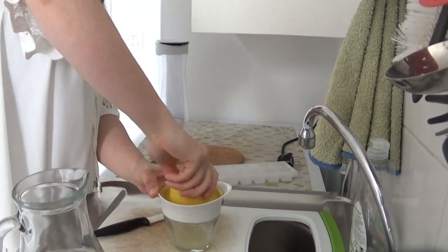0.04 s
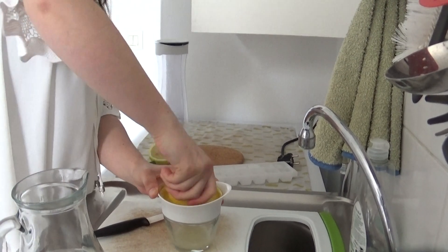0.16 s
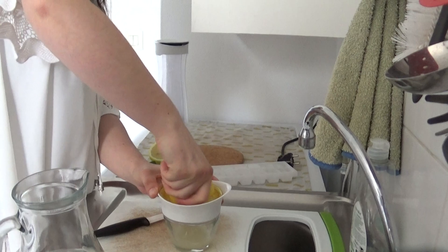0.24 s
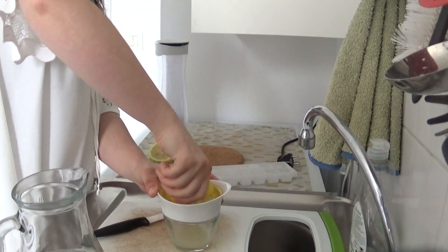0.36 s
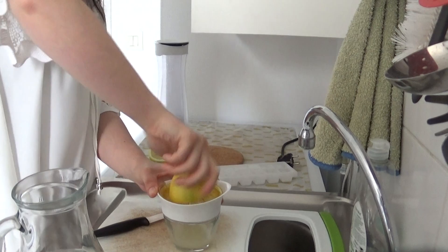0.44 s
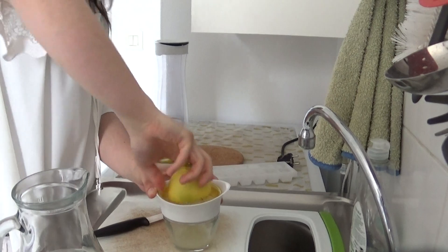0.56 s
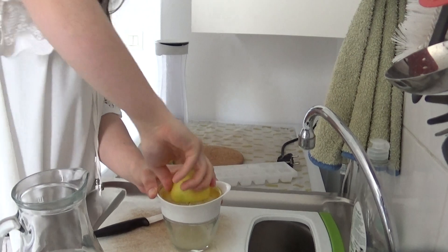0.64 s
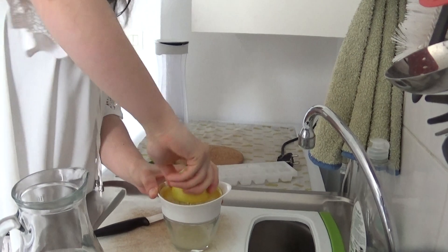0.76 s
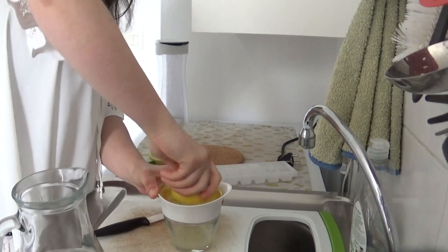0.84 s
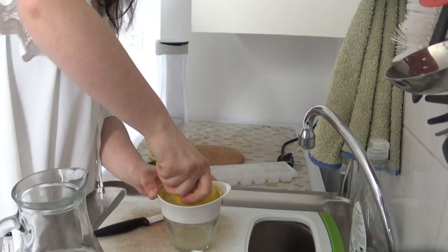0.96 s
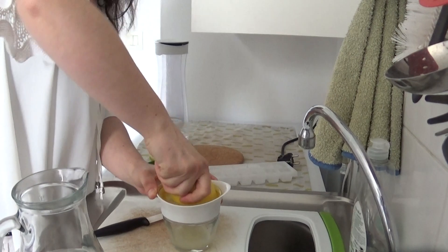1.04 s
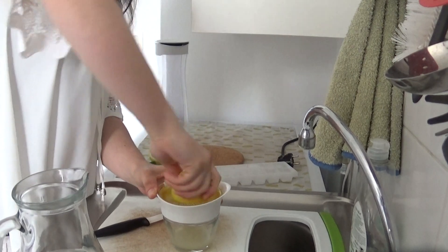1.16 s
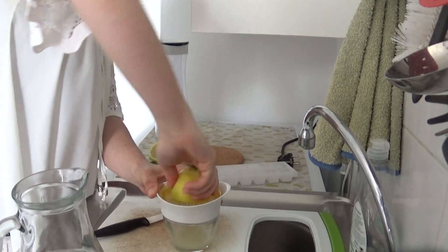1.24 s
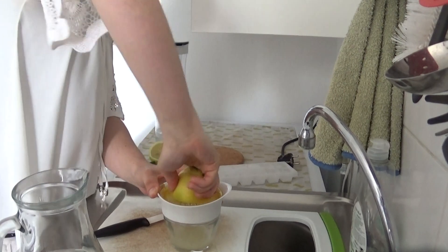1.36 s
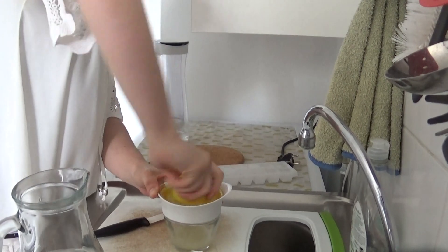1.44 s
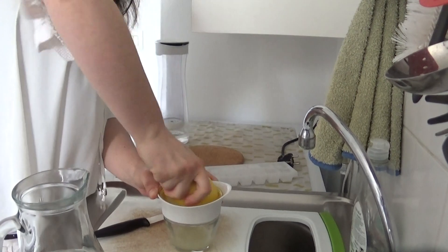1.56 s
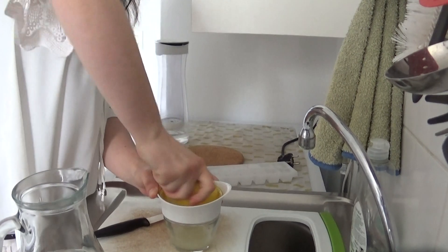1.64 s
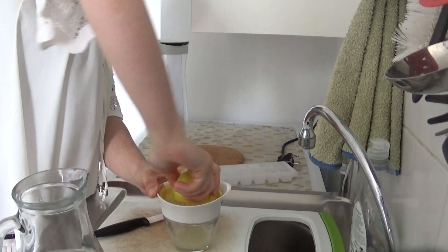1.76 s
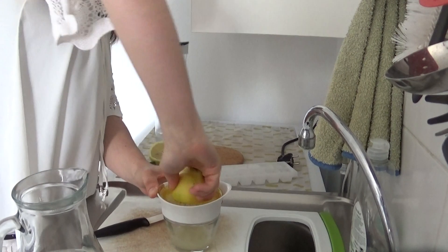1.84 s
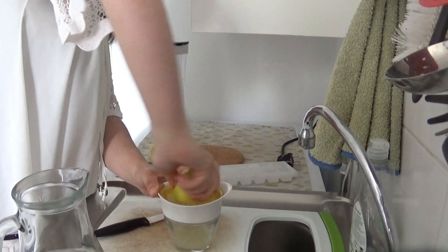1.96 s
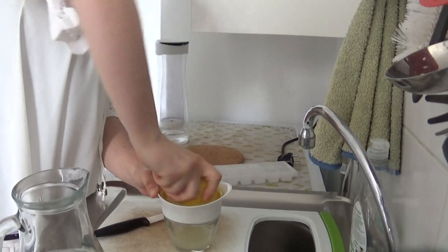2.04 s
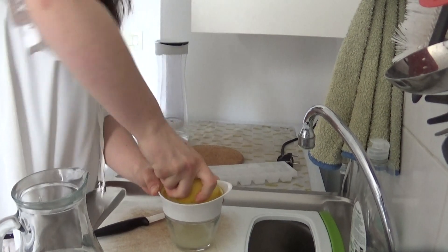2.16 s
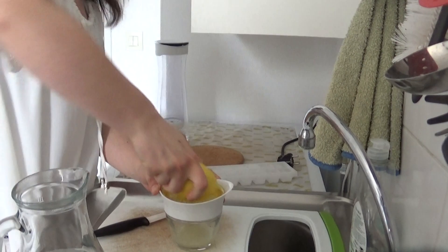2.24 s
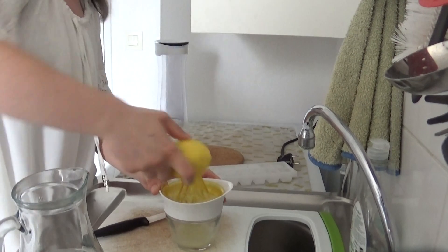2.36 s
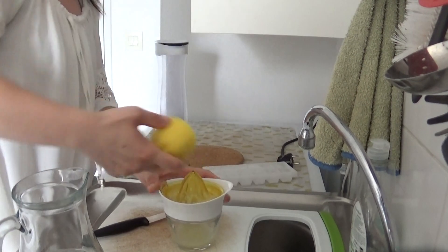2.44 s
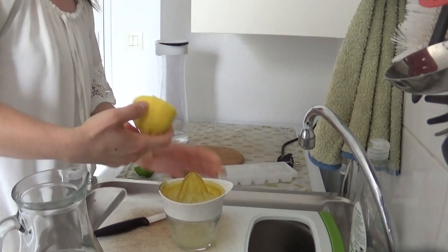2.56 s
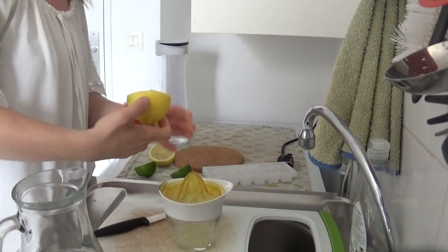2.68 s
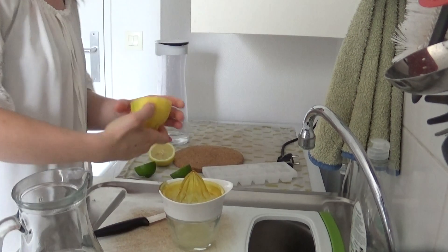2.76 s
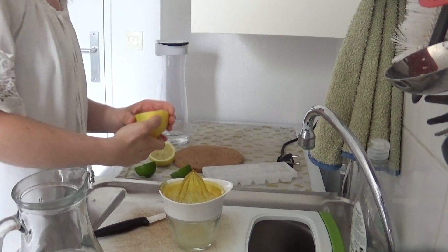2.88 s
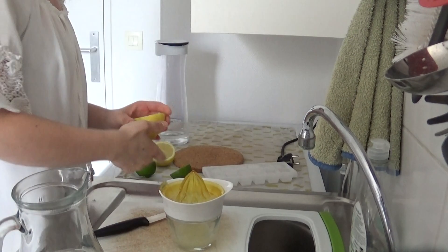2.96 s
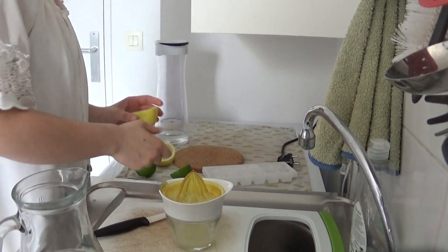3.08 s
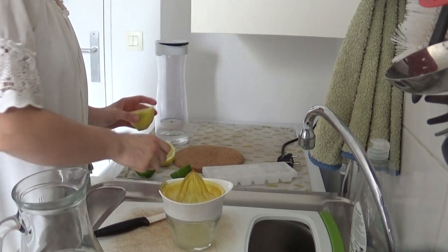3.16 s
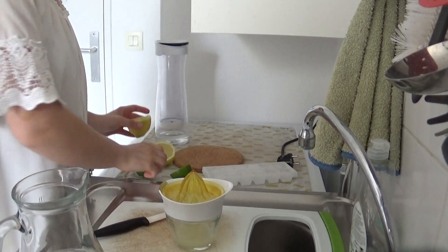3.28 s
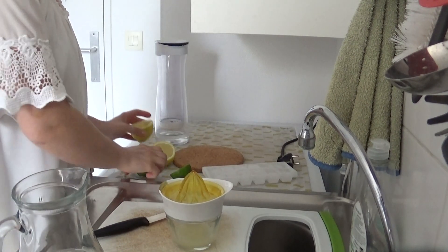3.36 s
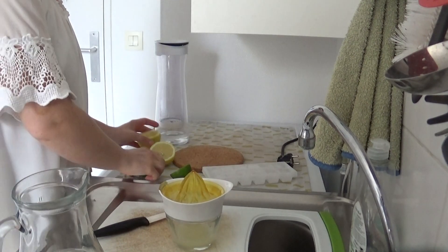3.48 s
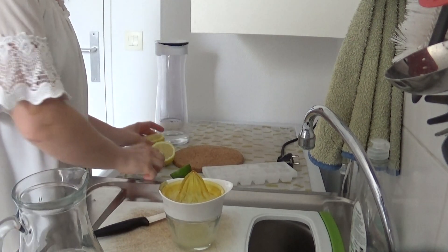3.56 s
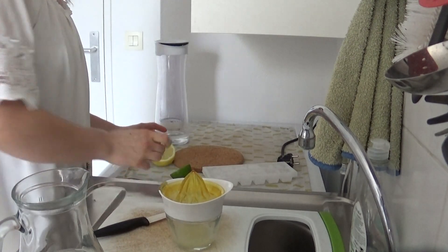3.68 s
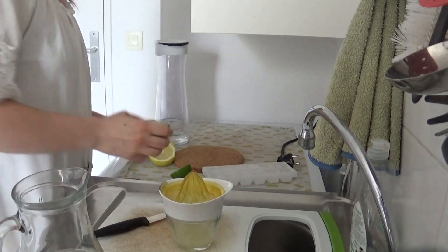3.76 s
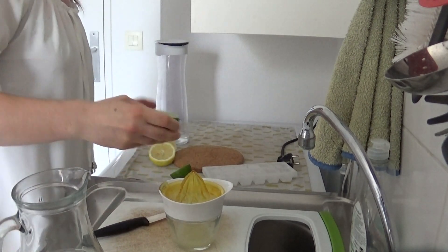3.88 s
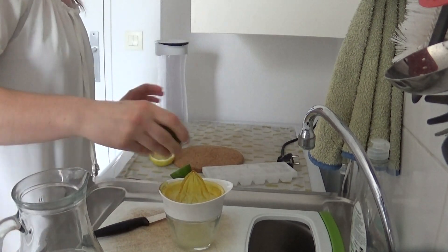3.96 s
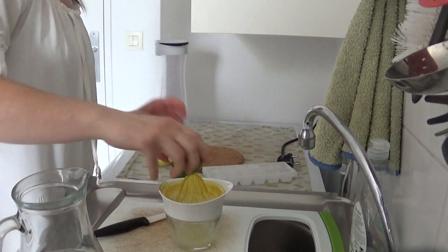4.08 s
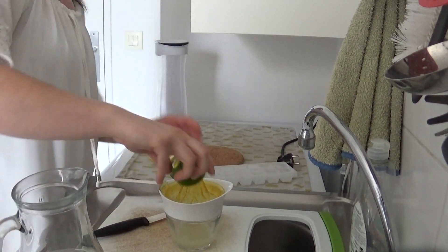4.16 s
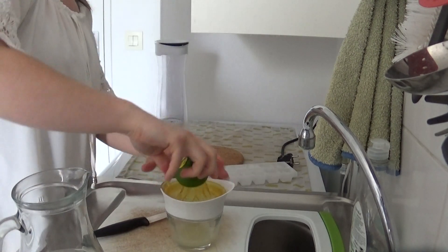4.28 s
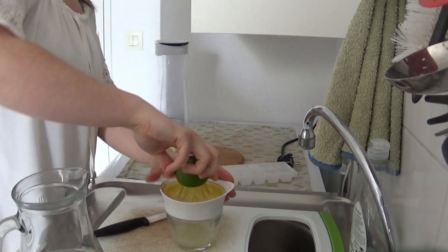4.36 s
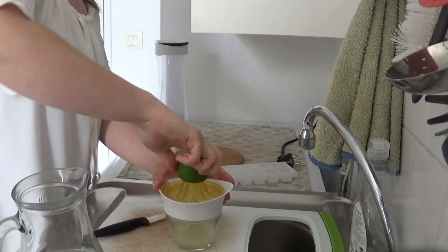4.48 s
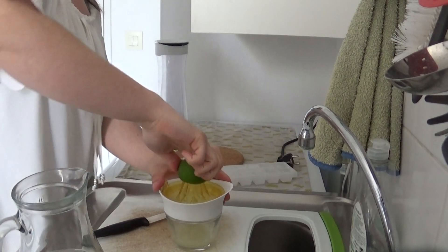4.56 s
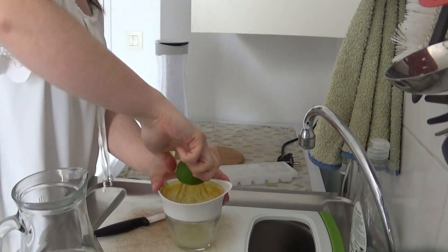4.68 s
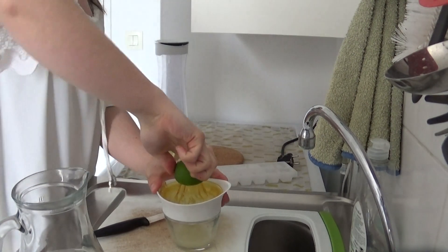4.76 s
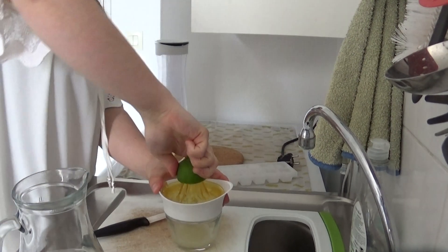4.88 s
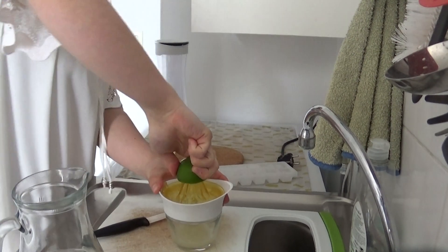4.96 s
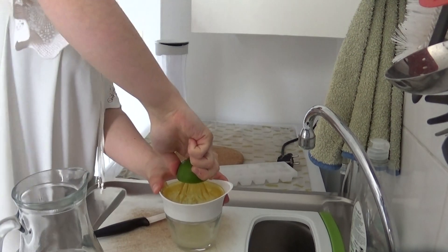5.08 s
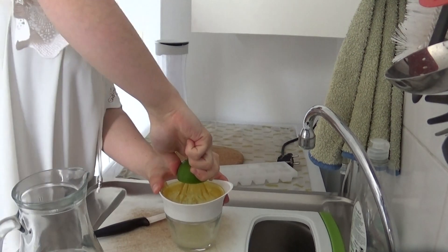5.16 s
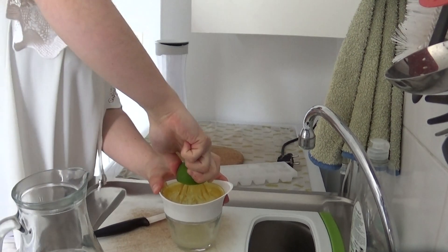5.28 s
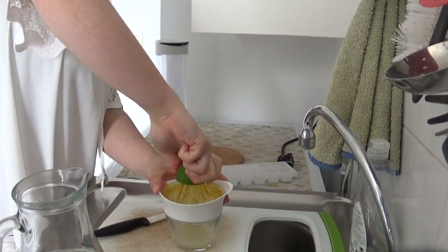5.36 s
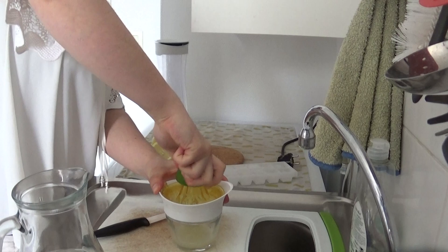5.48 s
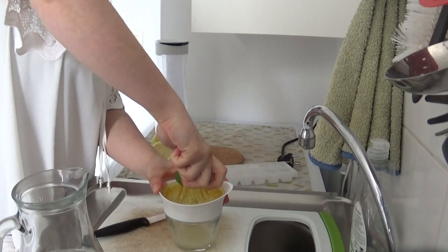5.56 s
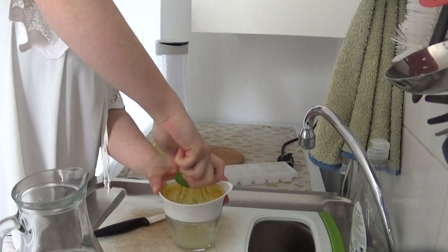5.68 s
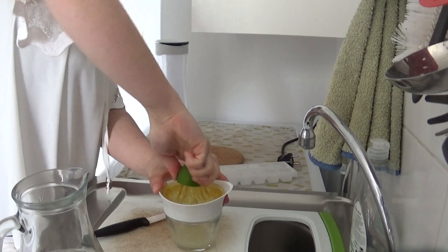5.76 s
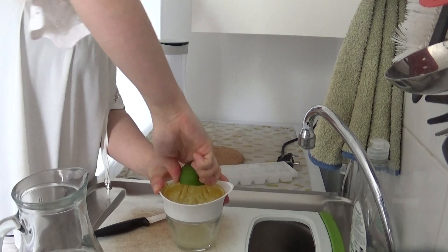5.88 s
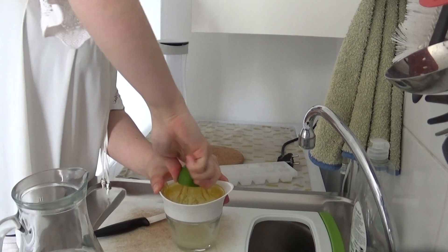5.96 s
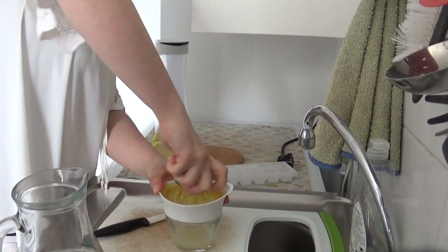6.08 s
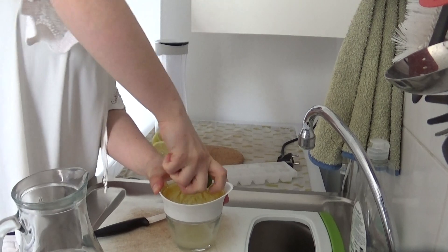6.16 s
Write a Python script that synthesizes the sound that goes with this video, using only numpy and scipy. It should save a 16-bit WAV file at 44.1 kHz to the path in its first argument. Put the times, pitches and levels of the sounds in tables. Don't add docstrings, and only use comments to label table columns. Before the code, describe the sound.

Juicy squishes, pops and rind smacks in a small kitchen, a dull put-down thud, a near-quiet pause, then faint plastic ticking and squeaky rubbing.

```python
import sys
import numpy as np
from scipy import signal
from scipy.fft import rfft, irfft
from scipy.io import wavfile
from scipy.ndimage import uniform_filter1d

SR = 44100
rng = np.random.default_rng(int(sys.argv[2]) if len(sys.argv) > 2 else 0)


def ratio(d):
    e = np.asarray(d, float) / 20
    return 10 ** e


def output_pcm(signal):
    pcm = np.clip(np.atleast_2d(signal).T, -1, 1) * 32767
    wavfile.write(sys.argv[1], SR, np.round(pcm).astype(np.int16))


N = 274302
HARD_FROM_S = 4.7


def evened(x):
    return x / np.sqrt(np.mean(x ** 2) + 1e-20)


def steady(x, over_s):
    return x / np.sqrt(uniform_filter1d(x ** 2, int(over_s * SR)) + 1e-9)


def read(points, hz):
    f, value = np.transpose(points)
    return np.interp(np.log(hz + 1), np.log(f + 1), value)


def over_time(points):
    return np.interp(np.arange(N) / SR, *np.transpose(points))


def colour(x, points):
    gain = ratio(read(points, np.fft.rfftfreq(len(x), 1 / SR)))
    return irfft(rfft(x) * gain, len(x))


def add(mix, s, sound):
    part = mix[round(s * SR):][:len(sound)]
    part += sound[:len(part)]


def ring(hz, t60, rise=0.000071, size=9000):
    t = np.arange(size) / SR
    return np.sin(2 * np.pi * hz * t) * ratio(-60 * t / max(t60, .002)) * (1 - np.exp(-t / rise))


def ring_all(modes, rise, size=9000):
    return sum(ratio(db) * ring(hz, t60, rise, size) for hz, db, t60 in modes)


def body(x, modes):
    response = sum(ratio(db) * np.sqrt(width) * ring(hz, 0.63 / width, size=4000) for hz, width, db in modes)
    return signal.oaconvolve(x, response)[:N]


def clicks(per_s, spread_db, clump_db, clump_s):
    size = ratio(spread_db * np.minimum(rng.exponential(1, N), 4)) * rng.choice([-1., 1.], N)
    clumps = evened(uniform_filter1d(rng.standard_normal(N), int(clump_s * SR)))
    return size * (rng.random(N) < per_s / SR) * ratio(clump_db * clumps)


def strokes(rows, rise_s, fall_db_per_s):
    t = np.arange(0, N / SR + .002, .001)
    power = 0
    for start, length, db, change_db in rows:
        u = t - start
        drift_db = change_db * np.clip(u / length, 0, 1)
        hold_db = db + drift_db - fall_db_per_s * np.maximum(u - length, 0)
        power = power + (np.clip(u / rise_s, 0, 1) * ratio(hold_db)) ** 2
    return np.interp(np.arange(N) / SR, t, np.sqrt(power))


def band_noise(x, low_hz, high_hz, order):
    return evened(signal.lfilter(*signal.butter(order, [low_hz, high_hz], "band", fs=SR), x))


def puffs(events, span, share, edge, crack):
    out, t = np.zeros(N), np.arange(9000) / SR
    for (s, db, hz, t60), noise in zip(events, rng.standard_normal((len(events), 9000))):
        low_hz, high_hz = np.clip([hz / span, hz * span], 300, .45 * SR)
        snap = crack * min(hz / 8000, 1) ** 2 * np.diff(noise, prepend=0) * ratio(-60 * t / 0.0041)
        puff = band_noise(noise, low_hz, high_hz, 2) * ratio(-60 * t / t60)
        tone = edge * ring(hz, 0.83 / hz, rise=.00003) + .5 * edge * ring(hz, t60 / 5)
        add(out, s, ratio(db) * (snap + tone + share * puff))
    return out


# (frequency [Hz], density [dB per Hz])
HISS = [(33, -24), (45, -4), (90, -2), (280, -2), (500, -8), (800, -10), (4000, -20), (7700, -21.5),
        (15900, -33)]
# (time [s], level [dB])
HISS_LEVEL = [(0, -50.5), (2.3, -51), (2.8, -54), (3.15, -54.5), (3.3, -56), (3.58, -57), (3.72, -55),
              (4.2, -57), (4.9, -56), (6.22, -54)]
# (frequency [Hz], likeness [0..1])
LIKENESS = [(30, 0.96), (180, 1), (550, 0.79), (1650, 0.3), (4970, 0.59), (15000, 1)]


def hiss():
    a, b = (rfft(colour(z, HISS)) for z in rng.standard_normal((2, N)))
    same = np.clip(read(LIKENESS, np.fft.rfftfreq(N, 1 / SR)), 0, 1)
    mid, side = np.sqrt((1 + same) / 2) * a, np.sqrt((1 - same) / 2) * b
    air = evened(irfft([mid + side, mid - side], N))
    motor_modes = [(2735, 33, 3.4), (322.6, 8.6, 14.3)]  # (Hz, width Hz, dB)
    whine = evened(body(clicks(900, 2.8, 0.75, 0.069), motor_modes)) * ratio(-8.0)
    return ratio(over_time(HISS_LEVEL)) * (air + whine)


# (time [s], level [dB])
LENS_LEVEL = [(0, -53.5), (2.2, -53), (2.5, -52.5), (3.6, -56.5), (6.22, -55.5)]


def lens_drive():
    first_s, step_s, level_db = .0248, .04, -1.5
    t, out = np.arange(1500) / SR, np.zeros(N)
    shape = np.minimum(t / .0015, 1) * ratio(-2600 * np.maximum(t - .005, 0))
    for k, (late, loud) in enumerate(rng.standard_normal((155, 2))):
        hz = 2750 if k % 26 == 5 and k > 60 else 3530
        whirr = shape * np.sin(2 * np.pi * hz * t)
        add(out, first_s + k * step_s + .0004 * late, ratio(level_db + .8 * loud) * whirr)
    return ratio(over_time(LENS_LEVEL)) * out


# (frequency [Hz], t60 [s])
KITCHEN = [(150, 0.32), (600, 0.36), (2000, 0.44), (6000, 0.42), (14000, 0.25)]


def kitchen(x):
    echoes = np.zeros((2, 30000))
    at = np.arange(80, 29980, 20) + rng.integers(0, 20, (2, 1495))
    np.put_along_axis(echoes, at, rng.choice([-1., 1.], at.shape), 1)
    hz, t, z = signal.stft(echoes, SR, nperseg=256)
    tail = signal.istft(z * ratio(-60 * t / read(KITCHEN, hz)[:, None]), SR, nperseg=256)[1]
    wet = signal.fftconvolve(x[None], tail / np.linalg.norm(tail[0]), axes=1)[:, :N]
    # (Hz, dB)
    apart = [(60, -32), (150, -18), (300, -8.5), (700, -4.5), (3000, -1.5), (8000, -4), (13000, -12)]
    mid, side = wet.mean(0), colour(wet[0] - wet[1], apart) / 2
    return np.array([mid + side, mid - side])


# (time [s], peak [dB], main mode [Hz], length [s])
KNOCKS = [(0.129, -28.5, 177, 0.057), (0.184, -28, 251, 0.066), (0.6755, -20.5, 227, 0.026),
          (0.686, -28.5, 85, 0.15), (0.808, -30.5, 265, 0.079), (3.722, -34, 222, .14),
          (.572, -39, 110, 0.14), (0.885, -23.5, 282, 0.036), (1.529, -29, 474, 0.055),
          (2.1, -30, 94.2, 0.014), (2.221, -30.5, 265, 0.07), (2.504, -41, 470, 0.07),
          (2.739, -44, 322, 0.037), (3.503, -43, 115, 0.086), (3.6172, -10.5, 178, 0.051),
          (3.9, -36, 171, 0.1), (4.301, -36.5, 79, 0.059), (4.412, -44.5, 430, 0.035),
          (4.478, -36, 95, 0.04), (4.758, -40.5, 468, 0.06), (4.853, -36.5, 120, 0.07),
          (4.943, -39, 252, 0.038), (5.13, -38.5, 470, 0.059), (5.173, -40, 250, 0.067),
          (5.178, -37.5, 476, 0.045), (5.594, -35, 444, 0.054), (5.877, -31.5, 490, 0.046),
          (5.2, -36, 474, 0.068), (5.26, -43.5, 474, 0.066), (5.301, -40, 420, 0.047),
          (5.444, -38, 474, 0.067), (5.8, -33, 474, 0.045), (5.848, -35.5, 485, 0.074),
          (2.23, -35, 474, 0.082), (6.11, -34, 149, 0.14), (3.619, -37, 390, 0.037),
          (5.559, -35, 271, 0.049), (5.596, -42, 266, 0.053), (6.041, -30, 255, 0.022),
          (6.09, -26, 260, 0.043), (6.095, -27, 470, 0.03)]
# (frequency [Hz], density [dB per Hz])
SHUDDER = [(60, 3), (120, -23), (230, 5.5), (330, 3.5), (480, -10.5), (800, -16.5), (2600, -30),
           (5000, -38)]


def knocks():
    out, t = np.zeros(N), np.arange(16000) / SR
    for (s, db, hz, t60), shake in zip(KNOCKS, rng.standard_normal((len(KNOCKS), 16000))):
        swell = t / (t60 / 6)
        blow = -np.sin(2 * np.pi * hz * t) * swell ** 2 * np.exp(1 - swell ** 2)
        fade = ratio(-14.0 - 60 * t / (6.5 * min(t60, .09))) * np.minimum(t / 0.023, 1)
        shudder = evened(colour(shake, SHUDDER)) * fade
        add(out, s, ratio(db) * blow + ratio(min(db, -17.0)) * shudder)
    return out


# (frequency [Hz], level [dB], t60 [s])
COUNTER = [(84.4, -36, 0.43), (153.4, -28, 0.33), (265, -20.5, 0.15), (227.7, -26.5, 0.47),
           (293, -41, 0.21), (344, -41, 0.26), (502, -31, 0.13), (710, -42, 0.14), (1010, -50, 0.2),
           (1174, -58, 0.27), (1810, -60, 0.17), (2180, -55, 0.12), (1440, -48, 0.16), (1600, -55, 0.25)]


def landing():
    out = np.zeros(N)
    add(out, 3.63, ring_all(COUNTER, rise=0.0034, size=20000))
    return out


# (frequency [Hz], level [dB], t60 [s])
SEAT = [(81, -27, .3), (624, -36, .12), (1034, -45, .08), (1168, -43, .1), (1480, -35, .08),
        (1701, -39, .09), (2067, -39, .08), (2450, -40, .07)]


def grip():
    out = np.zeros(N)
    add(out, .679, ring_all(SEAT, rise=0.0015))
    return out


# (start [s], length [s], rub on the ribs [dB], weight on the board [dB])
TURNS = [(0, 0.31, -42, -39), (0.33, 0.22, -55, -46.5), (0.572, 0.052, -50, -38.5),
         (0.672, 0.033, -37.5, -28.5), (0.784, 0.057, -42.5, -42.5), (0.88, .14, -38.5, -33.5),
         (1.1, 0.19, -45.5, -40.5), (1.235, 0.048, -51, -37), (1.443, 0.18, -40, -39),
         (1.701, 0.17, -44, -38), (2.004, 0.14, -39, -38.5), (2.175, 0.085, -41.5, -32.5),
         (2.32, 0.14, -62, -49.5), (3.805, 0.32, -68, -52), (4.28, 0.041, -68, -52),
         (4.418, 0.082, -54, -44.5), (4.542, 0.36, -64, -50.5), (4.941, 0.13, -55, -53),
         (5.125, 0.25, -54.5, -54), (5.294, 0.15, -48, -50), (5.507, 0.12, -45.5, -46.5),
         (5.718, 0.04, -47.5, -67), (5.747, 0.15, -44.5, -44.5), (5.999, 0.098, -41.5, -63),
         (6.086, 0.079, -38.5, -43)]
# (frequency [Hz], width [Hz], level [dB])
BOARD = [(84.5, 6.5, -3), (129, 35, 5), (154, 210, -11)]
GLASS = [(198, 16, -8.5), (269, 7.3, 0), (319.8, 9.1, -1.5), (474, 15, -1.5), (611.5, 12, -10.5)]
CONE = [(1050, 110, -5), (1270, 50, -2), (1560, 65, 0), (1830, 80, -2), (2100, 200, -5), (2420, 42, 3)]
# (frequency [Hz], level [dB])
WALL = [(500, -6), (1000, 3), (1500, 3.5), (2600, 0.5), (3000, 0), (5000, -14)]


def twist():
    rise_s, sag_db, fall_db_per_s = 0.011, -1, 240
    rub = strokes([(s, length, db, sag_db) for s, length, db, _ in TURNS], rise_s, fall_db_per_s)
    weight = strokes([(s, length, db, sag_db) for s, length, _, db in TURNS], rise_s, fall_db_per_s)
    slips = clicks(700, 2.66, 1.67, 0.0072)
    board = steady(body(clicks(90, 0.73, 3.0, 0.052), BOARD), 0.32) * weight * ratio(2.0)
    glass = steady(body(slips, GLASS), 0.12) * rub * ratio(1.5)
    cone_db = np.where(np.arange(N) < 3 * SR, -16.0, -7.0)
    judder = slips + 0.82 * clicks(2500, 1.6, 1.7, 0.019)
    cone = steady(colour(body(judder, CONE), WALL), 0.066) * rub * ratio(cone_db)
    grit = steady(colour(slips, WALL), 0.094) * ratio(-15.5)
    grit = grit + steady(body(slips, GLASS[3:]), 0.093) * ratio(-7.5)
    hard = np.arange(N) > HARD_FROM_S * SR
    return board + glass + cone + hard * rub * grit


# (time [s], peak [dB], main
# mode [Hz], t60 [s])
SOFT_TAPS = [(.0568, -25.5, 2440, 0.04), (.1765, -30, 2600, 0.2), (.4464, -36.5, 2500, 0.082),
             (.6795, -29, 1260, 0.21), (.683, -39, 1490, 0.037), (.688, -31, 1100, 0.05),
             (.8868, -16, 2670, 0.027), (1.269, -35, 2930, 0.059), (1.5229, -20.5, 2420, 0.059),
             (1.5499, -9, 1870, 0.03), (1.729, -37, 3000, .086), (2.2288, -34, 1320, 0.29),
             (2.5082, -38.5, 2500, 0.05), (3.6217, -36, 1520, 0.13), (3.628, -41, 870, 0.31),
             (.004, -35.5, 890, 0.24), (.135, -31, 720, 0.12), (4.4139, -43, 1140, 0.1),
             (4.7586, -36.5, 2200, 0.065)]
# (time [s], peak [dB], main mode [Hz])
HARD_TAPS = [(4.944, -42, 1500), (4.9932, -40.5, 1570), (5.0543, -44, 1640), (5.1292, -39, 2540),
             (5.177, -37.5, 1560), (5.0167, -48, 1170), (5.31, -35.5, 2520), (5.36, -40, 1580),
             (5.743, -43, 1540), (5.8043, -34, 1270), (5.537, -42, 1600), (5.725, -46, 1400),
             (5.4216, -36, 1280), (5.7943, -37, 1530), (5.8425, -38, 1520), (6.0085, -34, 1660),
             (6.0255, -31.5, 1590), (6.084, -35.5, 1820), (6.113, -31, 1500), (5.2012, -32.5, 1940),
             (5.2588, -39, 1190), (5.3004, -38, 2570), (5.3358, -38, 2420), (5.389, -40, 1100),
             (5.442, -27.5, 2580), (5.5124, -34.5, 1600), (5.559, -36, 1300), (5.5959, -35.5, 1310),
             (5.758, -33, 1630), (5.8819, -35.5, 1600), (5.996, -38, 1660), (6.092, -34, 1110),
             (6.139, -33, 1220), (6.1704, -40, 2460)]
# (frequency [Hz], level [dB], t60 [s])
CONE_RING = [(1270, -7, .08), (1560, -2, .07), (1820, -5, .05), (2100, -8, .04), (2420, 0, .1),
             (474, -4, .08)]


def taps():
    events = SOFT_TAPS + [(*row, 0.11) for row in HARD_TAPS]
    rattle = puffs(events, span=1.7, share=0.23, edge=0.56, crack=0.057)
    loudness = np.std(rattle)
    ringing = evened(colour(body(rattle, CONE), WALL)) * loudness
    hard = np.arange(N) > HARD_FROM_S * SR
    out = np.where(hard, 0.82 * colour(rattle, WALL) + 0.17 * rattle, 1.63 * rattle)
    out += np.where(hard, .9, .15) * ringing
    out += 0.67 * hard * evened(body(rattle, GLASS[3:])) * loudness
    cone = ring_all(CONE_RING, rise=0.000071, size=5000)
    for s, db, _ in HARD_TAPS:
        add(out, s, ratio(db - 12.5) * cone)
    return out


# (time [s], peak [dB], frequency [Hz])
SMACK = [
    (1.5498, -2.5, 4800),
    (1.5518, -10.5, 2000),
]
# (time [s], peak [dB], frequency [Hz])
SNAPS = [(.189, -19.5, 10500), (.4464, -34, 7000), (.5601, -50, 7100), (.571, -43, 6000), (.63, -40, 4000),
         (0.7746, -33, 4500), (0.852, -34, 11000), (.8729, -27, 9000), (1.1343, -30, 11000),
         (1.1588, -37, 8500), (1.1977, -31, 9500), (1.236, -28, 12000), (1.2678, -22, 7000),
         (1.38, -42, 8000), (1.4825, -19, 5000), (1.494, -25, 12500), (1.7559, -30, 8500),
         (1.801, -32, 6200), (1.8342, -29, 7200), (5.2011, -44, 2000), (5.384, -40, 3000),
         (5.4411, -34.5, 2400), (5.8811, -32, 3000)]


def snaps():
    out = np.zeros(N)
    for s, db, hz in SMACK + [(s, db + 6, hz) for s, db, hz in SNAPS]:
        u = np.pi * hz * np.arange(-60, 60) / SR
        add(out, s - 60 / SR, ratio(db) * (1 - 2 * u ** 2) * np.exp(-u ** 2))
    return out


# (time [s], peak [dB], pitch [Hz],
# t60 [s])
SQUEAKS = [
    (.189, -34, 4950, .2),
    (1.787, -33, 6170, .07),
    (5.559, -43, 9030, .08),
    (2.585, -56, 5200, .1),
    (4.455, -58, 8800, .08),
    (2.38, -62, 2800, .2),
    (2.74, -59, 2800, .25),
    (2.97, -61, 4950, .4),
    (3.04, -59, 4900, .3),
    (1.275, -42, 5300, .2),
]


def squeaks():
    return puffs(SQUEAKS, span=1.05, share=0.84, edge=.1, crack=0)


# (time [s], length [s], level [dB], slit [Hz], pocket [Hz])
SPUTTERS = [(0.123, 0.0077, -41, 4260, 1700), (0.774, 0.0035, -43, 8400, 2560),
            (0.792, .008, -50, 7860, 9100), (0.853, .006, -46, 6600, 9000),
            (0.871, .004, -32.5, 5930, 4000), (0.8833, 0.012, -33.5, 2720, 5000),
            (0.902, .008, -43, 5550, 8000), (0.992, 0.015, -43, 2330, 11100),
            (1.134, 0.0056, -45, 9700, 3000), (1.155, 0.014, -42.5, 8200, 3200),
            (1.199, 0.007, -46.5, 8700, 11500), (1.2344, 0.0052, -37.5, 2440, 11500),
            (1.268, 0.0038, -31.5, 5470, 2900), (1.4165, 0.0098, -32.5, 5550, 3900),
            (1.44, 0.0042, -29, 3900, 2630), (1.448, .005, -32, 5000, 3000),
            (1.465, 0.0045, -35, 4160, 2620), (1.478, 0.0067, -31.5, 8100, 5230),
            (1.489, 0.013, -39, 11000, 3250), (1.564, 0.0069, -28, 3980, 1860),
            (1.726, 0.0039, -42, 3950, 2400), (1.7564, 0.013, -38.5, 2860, 3850),
            (1.79, 0.02, -39.5, 6350, 5000), (1.834, 0.0051, -36, 6950, 6250),
            (2.044, 0.011, -39, 4240, 2450), (2.069, 0.0032, -45, 4200, 2550),
            (2.097, 0.0041, -44, 3430, 6000), (2.134, 0.0052, -42, 5840, 3620)]


def sputters():
    t60_s, slit_span = 0.038, 1.1
    out, t = np.zeros(N), np.arange(3000) / SR
    noises = rng.standard_normal((len(SPUTTERS), 2, 3000))
    for (s, length, db, slit_hz, pocket_hz), (air, crackle) in zip(SPUTTERS, noises):
        jet = air * ratio(6.2 * evened(uniform_filter1d(crackle, size=14)))
        slit = band_noise(jet, slit_hz / slit_span, slit_hz * slit_span, 1)
        pocket = band_noise(jet, pocket_hz / slit_span, pocket_hz * slit_span, 1)
        shape = np.minimum(t / 0.00071, 1) * ratio(-60 * np.maximum(t - length, 0) / t60_s)
        add(out, s, ratio(db) * shape * (slit + 0.52 * pocket + 0.1 * jet))
    return out


# (time [s], peak [dB], cavity [Hz])
SOFT_POPS = [(0.0555, -24, 4330), (0.0946, -22, 4200), (0.1232, -23, 4360), (0.189, -17.5, 4570),
             (.4459, -34, 5950), (.647, -31, 10500), (0.66, -25, 7300), (0.6875, -25.5, 5800),
             (0.7766, -32, 5500), (0.8204, -25, 6450), (0.8735, -26, 5200), (0.996, -28, 6300),
             (1.135, -34, 8920), (1.1983, -32, 8800), (1.233, -33, 4200), (1.2697, -26, 5300),
             (1.416, -38, 5840), (1.4417, -21, 4060), (1.4815, -12, 3420), (1.55, -17, 6000),
             (1.7272, -23, 3900), (1.79, -26, 6230), (1.8348, -22, 6900), (1.952, -30, 6950),
             (1.826, -36, 11200), (1.127, -32, 4600), (1.205, -40, 8440), (1.976, -45, 6000),
             (2.034, -24, 9500), (2.043, -21.5, 4300), (2.0673, -15, 4100), (2.231, -21, 3700),
             (2.4203, -37, 7900)]
# (time [s], peak [dB], cavity [Hz])
HARD_POPS = [(4.809, -41.5, 8900), (4.888, -37, 10400), (4.992, -36.5, 10300), (5.0188, -40, 10500),
             (5.0995, -44, 11000), (5.1761, -38, 7400), (5.301, -33.5, 7400), (5.3364, -36, 9360),
             (5.4214, -38, 9910), (5.442, -34, 7600), (5.512, -37, 7290), (5.537, -33, 7800),
             (5.5592, -29, 9100), (5.595, -33, 7750), (5.7595, -35.5, 4000), (5.843, -31, 7500),
             (5.8817, -37, 4200), (6.01, -35, 8000), (6.141, -29, 6260), (6.171, -29.5, 5060)]


def pops():
    bursts = [(*row, .05) for row in SOFT_POPS]
    ticks = [(*row, .025) for row in HARD_POPS]
    soft = puffs(bursts, span=1.17, share=0.17, edge=0.29, crack=0.53)
    hard = puffs(ticks, span=1.2, share=.25, edge=.35, crack=.5)
    return soft + ratio(1.0) * hard


# (start [s], length [s], fizz [dB],
# change of pressure over the stroke [dB], brightness [dB])
SQUIRTS = [(-.05, 0.34, -48, -3.5, -3.5), (.4, 0.52, -73, 14, -5), (0.75, .02, -61, 4, 3),
           (0.765, 0.094, -51.5, 0, -6), (0.884, 0.11, -41, -9.5, -1), (1.106, 0.031, -62, 15, 0),
           (1.135, 0.14, -51, 5, 0), (1.302, 0.11, -60.5, -3, -4), (1.413, 0.11, -43, 3.5, -3.5),
           (1.545, 0.12, -36.5, -20, 0), (1.723, 0.13, -42.5, -3, -1.5), (1.878, 0.092, -49, -12.5, -2),
           (1.97, 0.063, -49.5, 9.5, -4.5), (2.05, 0.14, -41, -14.5, -1.5),
           (2.215, 0.059, -48.5, -8.5, -1.5), (2.28, 0.14, -69, -11, 5), (2.41, 0.025, -68, 0, 7),
           (5.06, 0.2, -73.5, 8, 1.5), (5.3, 0.32, -62, -0.5, -1), (5.714, 0.17, -65.5, 7, 3.5),
           (6, 0.15, -58.5, 7.5, 0.5)]
# (frequency [Hz], density [dB per Hz])
FIZZ = [(1400, -35), (2000, -2), (2600, -8.5), (3500, -5), (5800, -11.5), (8700, -17), (11000, -26.5),
        (14000, -23)]
# (time [s], frequency [Hz])
GAP = [(0, 3530), (.2, 4570), (.76, 3600), (.83, 4350), (.89, 2860), (1.0, 2680), (1.13, 3120),
       (1.23, 2970), (1.29, 4460), (1.42, 4700), (1.47, 3800), (1.53, 2480), (1.6, 2100), (1.77, 3000),
       (1.8, 5340), (1.85, 6400), (1.98, 3200), (2.05, 3760), (2.25, 2760)]


def juice():
    rise_s, fall_db_per_s = 0.0015, 250
    level = strokes([row[:4] for row in SQUIRTS], rise_s, fall_db_per_s)
    bright_rows = [(s, length, db + bright_db, change_db) for s, length, db, change_db, bright_db in SQUIRTS]
    sheen = strokes(bright_rows, rise_s, fall_db_per_s)
    bubbles, kind = clicks(6000, 0.89, 2.5, 0.0086), rng.integers(0, 16, N)
    patches = uniform_filter1d(rng.standard_normal((N // 400 + 2, 16)), size=5, axis=0)
    patches = evened(uniform_filter1d(patches, size=3, axis=1))
    gap_hz = over_time(GAP)
    dull, bright = np.zeros((2, N))
    for k, hz in enumerate(np.geomspace(1500, 13500, 16)):
        grain = ring(hz, 12.7 / hz, rise=0.064 / hz, size=600) * hz * ratio(read(FIZZ, hz))
        patch = ratio(3.0 * np.interp(np.arange(N) / 400, np.arange(len(patches)), patches[:, k]))
        patch = patch * ratio(3.1 * np.exp(-(np.log(hz / gap_hz) / 0.15) ** 2))
        fizz = signal.oaconvolve(bubbles * patch * (kind == k), grain)[:N]
        add(bright if hz > 6500 else dull, 0, fizz)
    return steady(dull, 0.042) * level * ratio(5.0) + steady(bright, 0.14) * sheen * ratio(2.2)


# (frequency [Hz], level [dB])
MICROPHONE = [(20, -22), (42, -7.5), (60, -29), (75, -1), (6000, -2.5), (9500, -1), (12000, -9.5),
              (16000, -23)]


def scene():
    blows = knocks() + landing() + grip()
    rind = twist() + taps() + snaps()
    wet = squeaks() + sputters() + pops() + juice()
    near = colour(blows + rind + wet, MICROPHONE)
    return hiss() + lens_drive() + ratio(-7.0) * kitchen(near) + ratio(-1.5) * near


def low_pass(x):
    return signal.sosfilt(signal.butter(12, 16480, fs=SR, output="sos"), x)


def record(dry):
    edge = signal.firwin(511, 15850, window=("kaiser", 9), fs=SR)
    mix = signal.oaconvolve(dry, edge[None], "same") + ratio(-33.5) * dry
    return low_pass(mix)


dry = scene()
out = record(dry)
output_pcm(out)
```